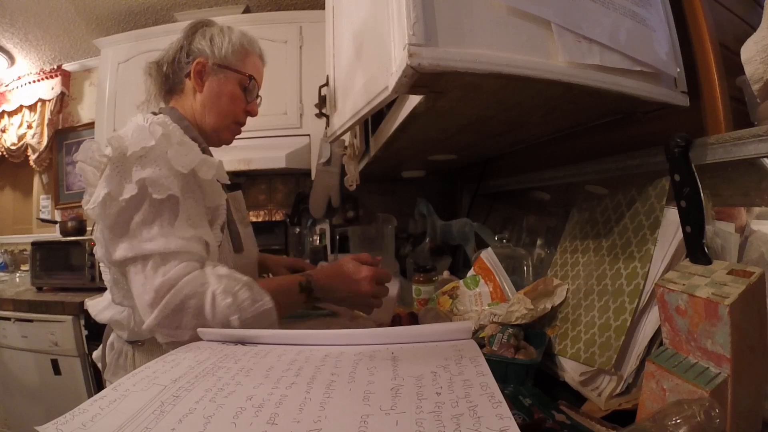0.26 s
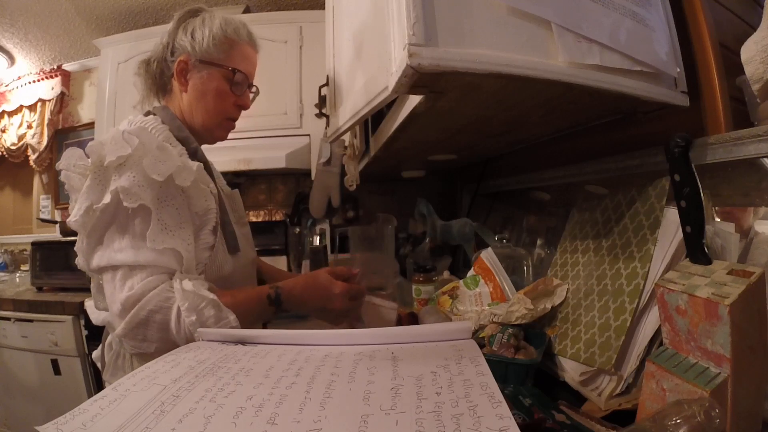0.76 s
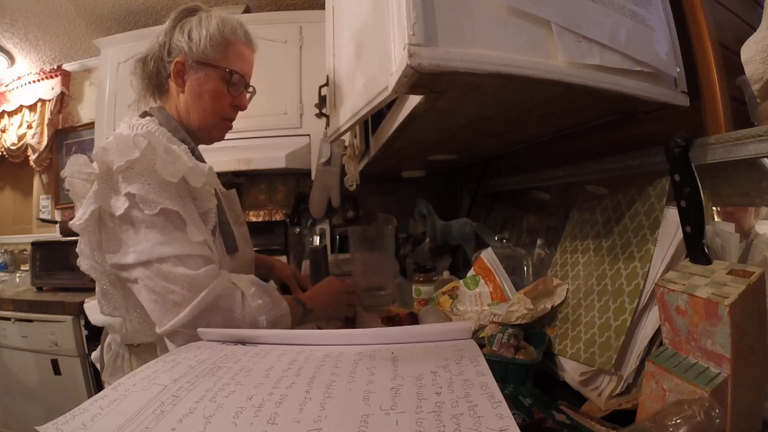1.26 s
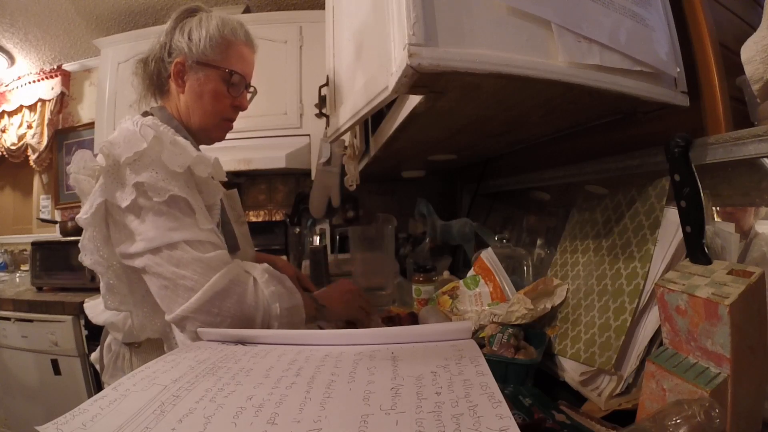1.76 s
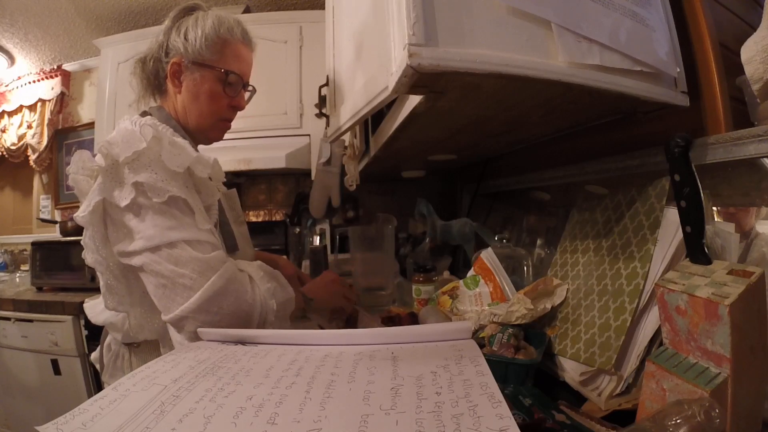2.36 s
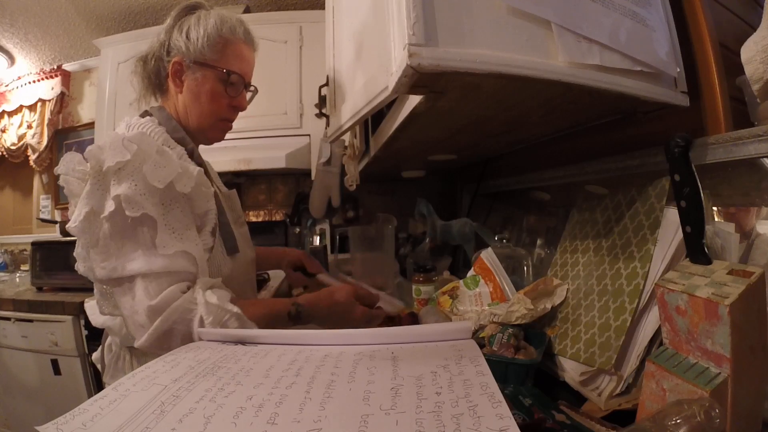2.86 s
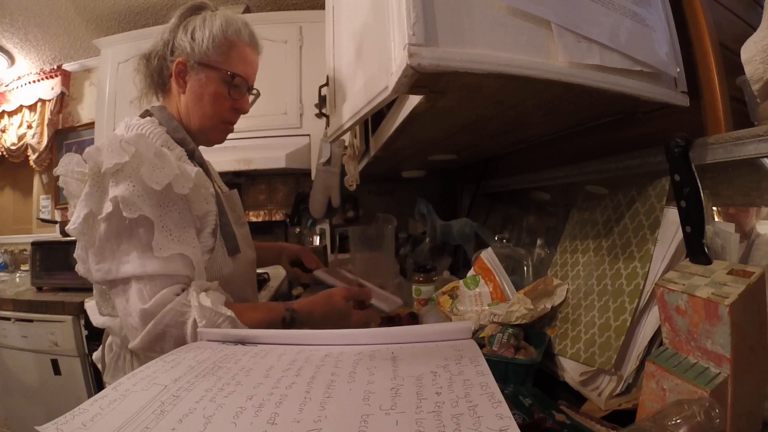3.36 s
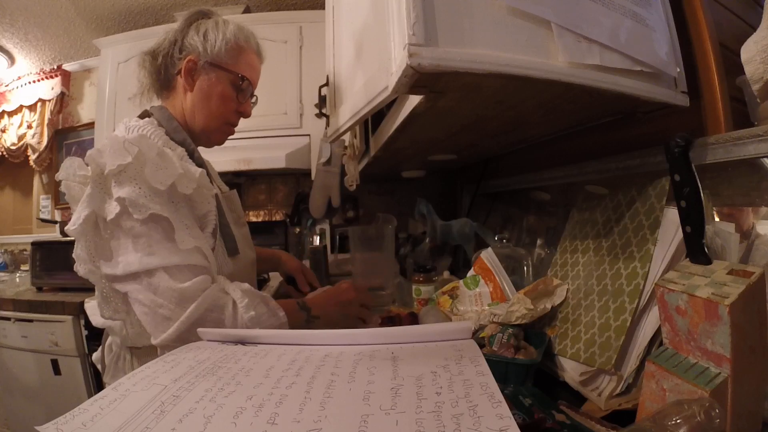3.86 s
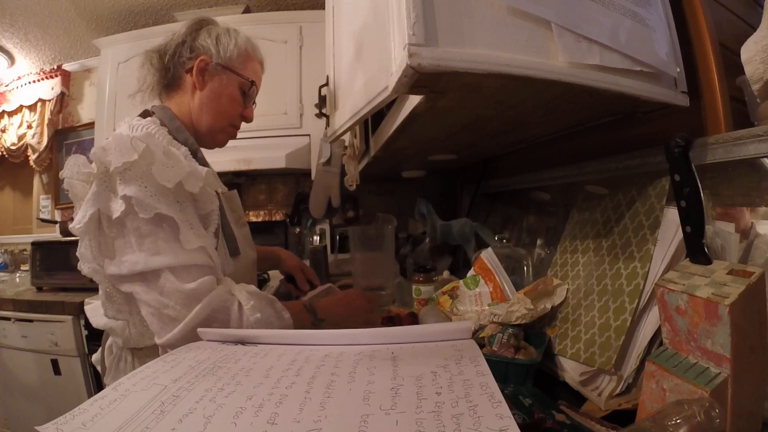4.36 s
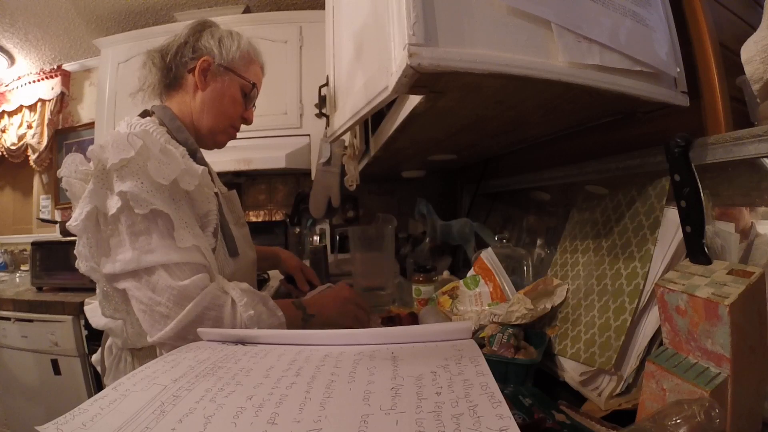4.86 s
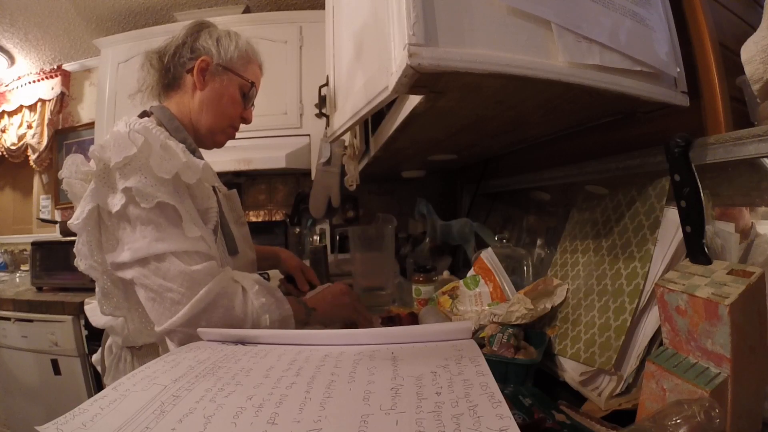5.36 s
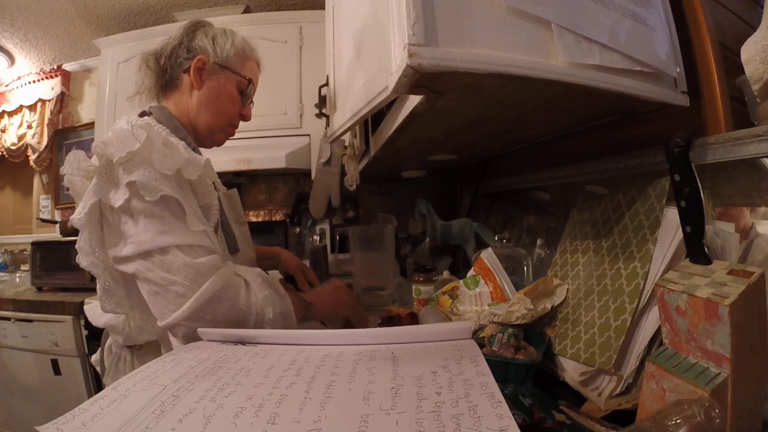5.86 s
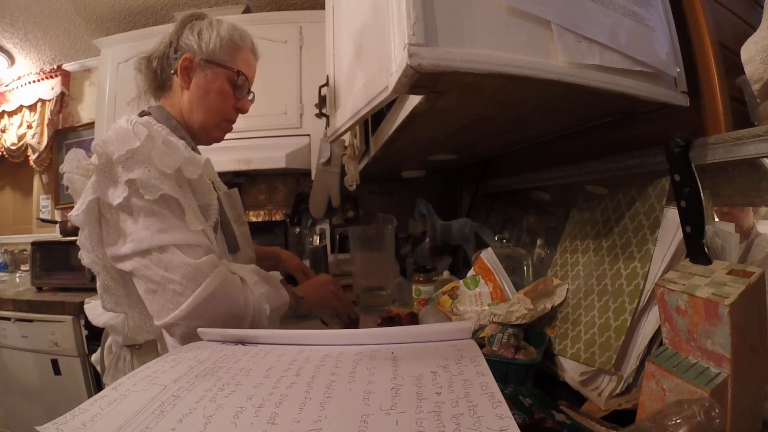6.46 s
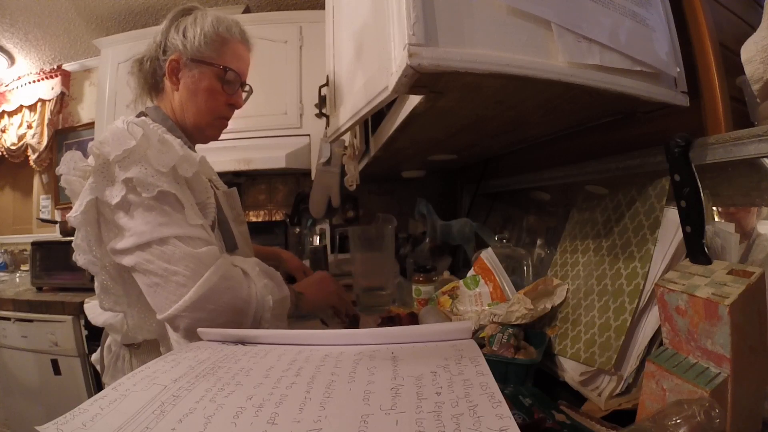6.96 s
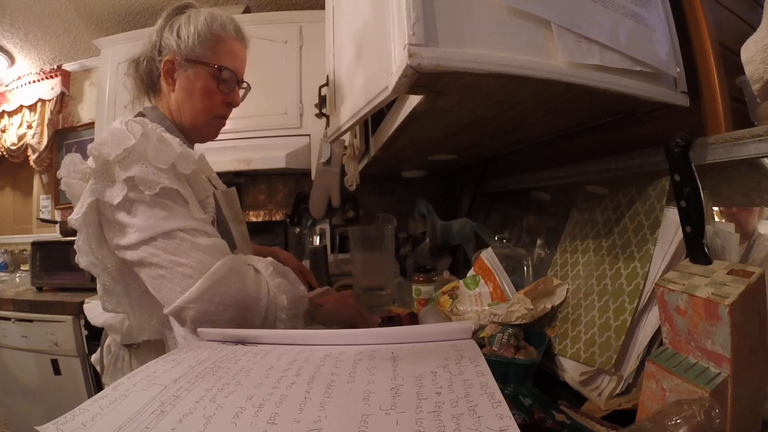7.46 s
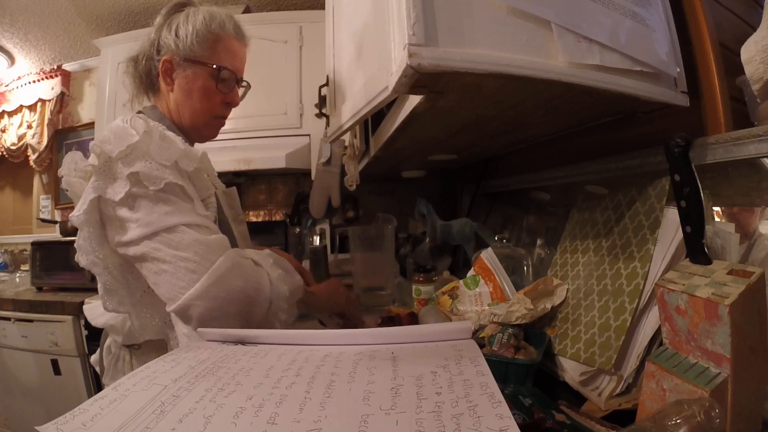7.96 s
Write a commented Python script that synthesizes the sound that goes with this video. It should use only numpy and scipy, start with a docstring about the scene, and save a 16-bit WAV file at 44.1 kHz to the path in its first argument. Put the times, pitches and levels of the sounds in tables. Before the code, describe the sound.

In a small kitchen, three loud hollow knocks land quickly on a board. A lighter knock follows, then a short run of rasping slicer strokes with small plastic ticks. After a pause and one medium knock with a sharp click, a longer, steady run of quiet rubbing strokes and clicks goes on to the end. Dull room noise and faint hum lie beneath; one nearby microphone, short room reflections.

```python
"""Onion on a handheld slicer

An onion is sliced on a plastic slicer in a small kitchen. Three hard knocks, two lighter ones and soft bumps
ring the modes of board and counter; two runs of strokes rub, hiss and judder as shaped noise and low tones.
Short clicks ring the slicer's frame; room noise, mains hum and a faint pulsing whine lie underneath.
Gain control ducks the sound on loud knocks and holds it down a moment."""
import sys
import numpy as np
from scipy import signal
from scipy.fft import rfft, irfft
from scipy.io import wavfile
from scipy.ndimage import uniform_filter1d, minimum_filter1d

SR = 44100
rng = np.random.default_rng(int(sys.argv[2]) if len(sys.argv) > 2 else 0)


def bounce(signal):
    """Save signal as a 16-bit WAV file at the path given by the first command-line argument."""
    frames = np.transpose(np.atleast_2d(signal))
    limited = np.clip(frames, -1, 1)
    pcm = np.round(limited * 32767).astype(np.int16)
    wavfile.write(sys.argv[1], SR, pcm)


N = 362502


def gain_of(db):
    """Decibels to an amplitude factor."""
    return 10 ** (np.asarray(db) / 20)


def evened(x):
    """Scales to rms 1."""
    return x / np.sqrt(np.mean(x ** 2) + 1e-20)


def read(points, hz):
    """Interpolates a table on a log-frequency axis."""
    f, value = np.transpose(points)
    return np.interp(np.log(hz + 1), np.log(f + 1), value)


def add(mix, start_s, sound):
    """Mixes a sound in at start_s, cut at the end of the mix."""
    part = mix[round(start_s * SR):][:len(sound)]
    part += sound[:len(part)]


def wander(max_hz):
    """Random wander of rms 1, no faster than max_hz."""
    spectrum = rfft(rng.standard_normal(N))
    return evened(irfft(spectrum * (np.fft.rfftfreq(N, 1 / SR) < max_hz), N))


def coloured(x, spectrum):
    """Causal (minimum-phase) filter of unit energy with the given spectrum."""
    log_gain = np.log(gain_of(read(spectrum, abs(np.fft.fftfreq(4096, 1 / SR)))))
    # the Hilbert transform of the log gain gives the minimum phase
    taps = np.fft.ifft(np.exp(np.conj(signal.hilbert(log_gain)))).real[:2048]
    return signal.oaconvolve(x, taps / np.linalg.norm(taps))[:len(x)]


def lowpass(x, hz, order=2):
    """Butterworth causal low-pass."""
    return signal.sosfilt(signal.butter(order, min(hz, SR / 2 - 1), fs=SR, output="sos"), x)


def ringing(modes, t, detune=1):
    """Sum of decaying cosines, one per mode (pitch_hz, level_db, t60_s)."""
    ring = 0
    for hz, db, t60_s in modes:
        decay = np.exp(-np.log(1000) * t / t60_s)
        ring = ring + gain_of(db) * decay * np.cos(2 * np.pi * hz * detune * t)
    return ring


def kitchen(early_db, early_s, direct):
    """Response of unit energy: direct sound, a burst of reflections from the cupboards, then the room's tail."""
    # reverberation time of the kitchen: freq_hz, t60_s
    room_t60 = [(100, 0.54), (300, 0.31), (700, 0.33), (1800, 0.23), (5000, 0.19), (9000, 0.17),
                (14000, 0.17)]
    t = np.arange(SR // 3) / SR
    hz, at_s, noise = signal.stft(rng.choice([-1., 1.], len(t)), SR, nperseg=256)
    decay_db = -60 * at_s / read(room_t60, hz)[:, None]
    tail = signal.istft(noise * gain_of(decay_db), SR, nperseg=256)[1][:len(t)]
    tail *= 1 + gain_of(early_db) * np.exp(-(t / early_s) ** 2)
    tail /= np.linalg.norm(tail)
    tail[0] += direct
    return tail / np.linalg.norm(tail)


def room_noise(air_db=-49, waver_db=0.73, waver_hz=6, hum_hz=60, hum_db=-59.5):
    """Dull steady air noise, gathered in a few resonances, wavers slightly over a sine of mains hum."""
    # spectrum of the room's air noise: freq_hz, level_db_per_hz
    air_spectrum = [(12, -26), (20, -1.5), (64, -5.5), (115, -5), (135, -11), (174, -2.5), (217, -12),
                    (263, -9), (294, -12.5), (337, -12.5), (620, -15.5), (774, -15), (914, -21.5),
                    (1400, -25.5), (2800, -31), (5500, -38), (11700, -47), (15000, -54)]
    # resonances that lift it: centre_hz, width_hz, lift_db
    air_peaks = [(244, 31, 1), (549, 17.5, 4), (880, 205, 3)]
    hz, t = np.fft.rfftfreq(N, 1 / SR), np.arange(N) / SR
    shape_db = read(air_spectrum, hz)
    for centre_hz, width_hz, lift_db in air_peaks:
        shape_db = shape_db + lift_db * np.exp(-((hz - centre_hz) / width_hz) ** 2)
    air = evened(irfft(rfft(rng.standard_normal(N)) * gain_of(shape_db), N))
    hum = np.sqrt(2) * np.sin(2 * np.pi * hum_hz * t)
    return gain_of(air_db + waver_db * wander(waver_hz)) * air + gain_of(hum_db) * hum


def pips(pitch_hz=11290, level_db=-78.5, every_s=0.168, pip_s=0.045, waver_hz=20, undertone_db=-3):
    """A very faint high whine, with its lower octave, pulses about six times a second."""
    phase, gate = 2 * np.pi * np.cumsum(pitch_hz + waver_hz * wander(34)) / SR, np.zeros(N)
    whine = np.sqrt(2) * (np.sin(phase) + gain_of(undertone_db) * np.sin(phase / 2))
    for s in np.arange(every_s, N / SR, every_s):
        add(gate, s - rng.uniform(0, pip_s / 2), np.hanning(int(pip_s * SR)))
    return gain_of(level_db) * gate * whine


def board(build_s=0.01, direct_db=8, tail_db=5, crack_db=-4, bass_hz=260, detune_share=0.0054):
    """Every blow rings the same modes, adds thud and crack; softer contact passes less treble of ring and thud."""
    # blows, from hard knocks to light bumps of the slicer:
    # start_s, force_db, hardness_hz, bass_weight_db, crack_db, hollowness_db
    blows = [(0.4608, 5, 2220, 3.5, 0.5, 2.5), (0.6678, 4.5, 1970, 5, 0.5, 1.5),
             (0.8375, 4.5, 1860, 6, 1, 1.5), (1.227, -12, 1213, 0, -8, -2.5),
             (1.637, -27.5, 1010, -4, 1.5, -4), (3.6755, -7, 1920, 1.5, -3.5, -5.5),
             (5.258, -28.5, 1200, -18, 2, -3), (6.045, -29.5, 1100, 2, -6, -10),
             (6.278, -29, 592, 1, -14, 0), (6.88, -34, 1200, -2, 13, -5), (6.895, -20.5, 680, 1, -11, -2),
             (7.451, -28, 800, 6.5, -6, -8), (7.988, -18.5, 398, 2, -20, 1)]
    # modes of board and counter: pitch_hz, level_db, t60_s
    board_modes = [(119, -60, 0.19), (142.7, -27.5, 0.24), (155.6, -11, 0.071), (182.6, -20.5, 0.15),
                   (290.5, -20, 0.11), (367.4, -8.5, 0.06), (399.2, -23, .2), (463, -27, 0.17),
                   (503, -31, 0.24), (579.8, -18.5, 0.13), (710, -21, 0.16), (796, -35, 0.15),
                   (830, -4, 0.06), (951, -15, 0.038), (1088, -13, 0.056), (1181, -7.5, 0.04),
                   (1357, -27, 0.08), (1880, -36, 0.12), (2190, -38.5, 0.21), (2240, -46, 0.22)]
    # spectrum of a blow's push: freq_hz, level_db_per_hz
    thud_spectrum = [(50, -33), (120, 10), (250, 0), (400, 1.5), (850, 1), (1250, -11), (1600, -26.5),
                     (2200, -24.5), (3500, -67), (8000, -58)]
    # spectrum of its contact crack: freq_hz, level_db_per_hz
    crack_spectrum = [(500, -16), (1500, -2.5), (2200, 0), (3000, -3), (4000, -2.5), (5500, -4), (8000, -7),
                      (11500, -9), (15000, -20)]
    # paths by counter, splashback and overhead cupboard: delay_s, gain (relative)
    paths = [(0, 0.72), (.0018, -1.19), (.0028, 0.11), (.005, 0.22), (.008, -0.41), (.011, .75),
             (0.014, -0.21), (.0235, -0.3)]
    # the board's hollow middle register, woken according to where a blow lands: low_hz, high_hz
    hollow_hz = (267, 440)
    bite_hz, bite_db, bite_decay_s = (1350, 2530), -10.5, 0.008  # sharp first contact
    lowest_hz = 85

    t, out = np.arange(SR // 3) / SR, np.zeros(N)
    arrivals = gain_of(tail_db) * kitchen(early_db=-5.5, early_s=0.042, direct=0)
    arrivals -= lowpass(arrivals, bass_hz, order=1)  # the diffuse tail is kept light in bass
    for delay_s, gain in paths:
        add(arrivals, abs(delay_s), np.array([gain * gain_of(direct_db)]))
    thud = coloured(arrivals, thud_spectrum)
    hollow_filter = signal.butter(1, hollow_hz, "bandpass", fs=SR)
    bite_filter = signal.butter(2, bite_hz, "bandpass", fs=SR, output="sos")

    for start_s, force_db, hard_hz, weight_db, snap_db, hollow_db in blows:
        # the hand's load detunes the modes a little
        ring = ringing(board_modes, t, detune=1 + detune_share * rng.standard_normal())
        body = lowpass(ring * (1 - np.exp(-t / build_s)) + thud, hard_hz)
        body += (gain_of(weight_db) - 1) * lowpass(body, bass_hz, order=1)
        body += (gain_of(hollow_db) - 1) * signal.lfilter(*hollow_filter, body)
        # the crack is screened by the hands and arrives mostly off the walls
        reflections = kitchen(early_db=-6, early_s=0.0075, direct=0) * (1 - np.exp(-t / 0.007))
        crack = gain_of(crack_db) * coloured(reflections, crack_spectrum)
        contact = rng.standard_normal(len(t)) * np.exp(-t / bite_decay_s)
        bite = signal.sosfilt(bite_filter, contact)
        crack += gain_of(bite_db) * bite / np.linalg.norm(bite)
        add(out, start_s, gain_of(force_db) * (body + gain_of(snap_db) * crack))
    # no deep bass below the knocks
    return signal.sosfilt(signal.butter(2, lowest_hz, "highpass", fs=SR, output="sos"), out)


def plastic(x, detune=1):
    """Ring of the slicer's plastic frame when x shakes it."""
    # modes of the frame: pitch_hz, level_db, t60_s
    slicer_modes = [(714, -23, 0.2), (1090, -40, 0.046), (2217, -23, 0.036), (2750, -35, 0.071),
                    (6130, -31, 0.03)]
    t = np.arange(SR // 10) / SR
    return signal.oaconvolve(x, ringing(slicer_modes, t, detune))[:N]


def clicks(click_db=11, grip_share=0.034):
    """Short ticks ring the slicer, each with its own reflections; the changing grip detunes the ring."""
    # slicer landing or onion catching on it: start_s, level_db (relative), frame_ring_db
    clacks = [(1.2286, -39, 4), (1.6322, -40.5, -3), (1.6811, -37, -10), (2.1909, -49, -6),
              (2.4463, -53, -5), (3.677, -28.5, -4), (5.2574, -37, -9), (5.3418, -37.5, -7),
              (5.5694, -39, -3), (6.0162, -32.5, -16), (6.0422, -37.5, 4), (6.2726, -43, 4),
              (6.4727, -36, -15), (6.4971, -36, -12), (6.8768, -36, -7), (6.9242, -39, -12),
              (7.1841, -34.5, -8), (7.4515, -41, 6), (7.4924, -35, -12), (7.7069, -37.5, -2),
              (7.934, -49, 4), (7.9863, -42, 3)]
    # spectrum of a tick: freq_hz, level_db_per_hz
    tick_spectrum = [(200, 3), (600, 18), (1500, 2.5), (2300, 6.5), (4000, -3), (6000, 4), (8000, -26),
                     (11500, -1), (15000, -33)]
    ticks, rings = np.zeros((2, N))
    for start_s, db, ring_db in clacks:
        tick = gain_of(db + click_db) * kitchen(early_db=10, early_s=0.008, direct=0.3)
        grip = 1 + grip_share * rng.standard_normal()
        add(ticks, start_s, tick)
        add(rings, start_s, gain_of(ring_db) * plastic(tick, detune=grip))
    return coloured(ticks, tick_spectrum) + rings


def grains(per_s, spread_db, spots=6):
    """Steady run of tiny slips or bursting cells of uneven size; each spot on the slicer has its own reflections."""
    sizes = gain_of(spread_db * np.minimum(rng.exponential(1, N), 4)) * rng.choice([-1., 1.], N)
    train = sizes * (rng.random(N) < per_s / SR)
    spot = rng.integers(0, spots, N)
    out = np.zeros(N)
    for k in range(spots):
        response = kitchen(early_db=13, early_s=0.021, direct=0.27)
        out += signal.oaconvolve(train * (spot == k), response)[:N]
    return out


def push(t, length_s, attack_s, sag_db, release_s):
    """Envelope of a push: it rises, sags while it lasts, then dies away."""
    rise = np.minimum(t / attack_s, 1)
    sag = gain_of(-sag_db * np.minimum(t / length_s, 1))
    return rise * sag * np.exp(-np.maximum(t - length_s, 0) / release_s)


def slicing(rub_db=4.5, judder_db=-1, sway_hz=8, ring_db=-20, roughness_db=0.6):
    """The onion rubs down the bed, hisses through the blade while the slicer judders, and slides lightly."""
    # pushes over the blade; an onion that sticks goes through in two:
    # start_s, length_s, bed_rub_db (relative), blade_hiss_db, judder_db (relative), press_peak_after_s
    strokes = [(1.427, 0.063, -60.5, -65, -46.5, 0.034), (1.678, 0.039, -55.5, -59.5, -36, 0.019),
               (1.926, 0.078, -56.5, -62, -39.5, .026), (2.126, 0.024, -58, -61, -50, .02),
               (2.176, 0.049, -52.5, -53.5, -37.5, 0.056), (2.434, 0.061, -54, -58, -40.5, 0.04),
               (5.325, 0.029, -57, -57, -41.5, 0.0091), (5.543, 0.05, -61, -59, -51, 0.059),
               (5.783, 0.046, -61, -60, -46.5, 0.01), (6.035, 0.052, -60.5, -61, -43.5, 0.014),
               (6.268, 0.058, -57.5, -60, -41.5, 0.019), (6.464, 0.043, -61.5, -62, -48, 0.027),
               (6.52, 0.047, -59, -64, -40.5, 0.05), (6.866, 0.062, -57.5, -64, -39, 0.043),
               (7.179, 0.071, -57, -58.5, -41, 0.065), (7.434, 0.086, -57.5, -62, -41, 0.054),
               (7.696, 0.088, -55, -60.5, -41, 0.073), (7.975, 0.08, -54, -61, -42, 0.058)]
    # light slides of onion and slicer between blows and strokes: start_s, length_s, level_db (relative)
    slides = [(0.434, 0.018, -64), (1.314, 0.037, -65), (1.872, 0.077, -62), (2.38, 0.045, -69),
              (5.263, 0.068, -64), (5.494, 0.044, -66), (5.72, 0.081, -68), (5.968, 0.11, -63.5),
              (6.187, 0.064, -66.5), (6.417, 0.057, -69), (6.733, 0.046, -63), (7.055, 0.045, -62.5),
              (7.36, 0.067, -64), (7.625, 0.085, -65), (7.91, 0.058, -62), (8.13, 0.2, -67)]
    # spectrum of the rub: freq_hz, level_db_per_hz
    rub_spectrum = [(100, -16), (200, 8), (400, 9), (720, 12.5), (1100, 2), (1600, 0), (2300, 1.5),
                    (2800, 1.5), (3300, 0), (4800, -1), (6000, -2), (7500, -12.5), (12000, -17)]
    # spectrum of the blade's hiss: freq_hz, level_db_per_hz
    blade_spectrum = [(3000, -22), (6000, -7), (8000, -1), (10000, 0), (11500, 0), (13000, -3), (14000, -5),
                      (15000, -9)]
    # low board resonances that a stroke shakes, beating together: pitch_hz (centre), level_db
    judder_modes = [(145, -1.5), (184, -4), (272, -15.5)]
    sink_share = 0.63  # part of the push in which the blade sinks in and the hiss grows
    judder_share = 0.42  # half width of the judder's swell, as a share of the push

    t, (rub, blade, judder) = np.arange(SR // 3) / SR, np.zeros((3, N))
    for start_s, length_s, bed_db, cut_db, press_db, press_s in strokes:
        rubbing = push(t, length_s, attack_s=0.013, sag_db=1, release_s=0.031)
        cutting = push(t, length_s, attack_s=sink_share * length_s, sag_db=4, release_s=0.031)
        swell = 1 / (1 + ((t - press_s) / (judder_share * length_s)) ** 2)
        add(rub, start_s, gain_of(bed_db) * rubbing)
        add(blade, start_s, gain_of(cut_db) * cutting)
        add(judder, start_s, gain_of(press_db + judder_db) * swell)
    for start_s, length_s, db in slides:
        slide = gain_of(db) * signal.windows.tukey(int(length_s * SR), 0.7)
        add(rub, start_s, slide)
        add(blade, start_s, gain_of(-8.5) * slide)

    catches = grains(per_s=450, spread_db=2.0)
    slips = evened(coloured(catches, rub_spectrum) + gain_of(ring_db) * plastic(catches))
    cells = evened(coloured(grains(per_s=2700, spread_db=5.0), blade_spectrum))
    flutter = gain_of(roughness_db * wander(57))  # the strokes' loudness flutters at random
    # the pressed slicer shudders unevenly at the board's lowest resonances
    shudder = np.zeros(N)
    for hz, db in judder_modes:
        phase = 2 * np.pi * np.cumsum(hz + sway_hz * wander(51)) / SR
        shudder += gain_of(db) * np.sqrt(2) * np.sin(phase)
    cut = flutter * (gain_of(rub_db) * rub * slips + blade * cells)
    return cut + uniform_filter1d(judder, size=300) * shudder


def scene():
    """All sources summed at one microphone."""
    return (room_noise() + pips() + board() + clicks() + slicing())[None]


def record(dry, threshold_db=-22, most_db=5, hold_s=0.19, ease_s=0.12, edge_hz=15300):
    """Gain control ducks on loud knocks, holds and eases back; peaks clip; then the band limit."""
    power_db = 10 * np.log10(abs(uniform_filter1d(dry[0] ** 2, size=400)) + 1e-12)
    over_db, half = np.clip(power_db - threshold_db, 0, most_db), int(hold_s * SR / 2)
    held_db = -minimum_filter1d(-over_db, 2 * half + 1, origin=half)  # maximum over the past hold_s
    keep = np.exp(-1 / (ease_s * SR))
    duck_db = signal.lfilter([1 - keep], [1, -keep], held_db)
    ducked = np.clip(dry / gain_of(duck_db), -1, 1)
    band_limit = signal.firwin(511, edge_hz, window=("kaiser", 9), fs=SR)
    return signal.oaconvolve(ducked, band_limit[None], "same")


dry = scene()
out = record(dry)
bounce(out)
```